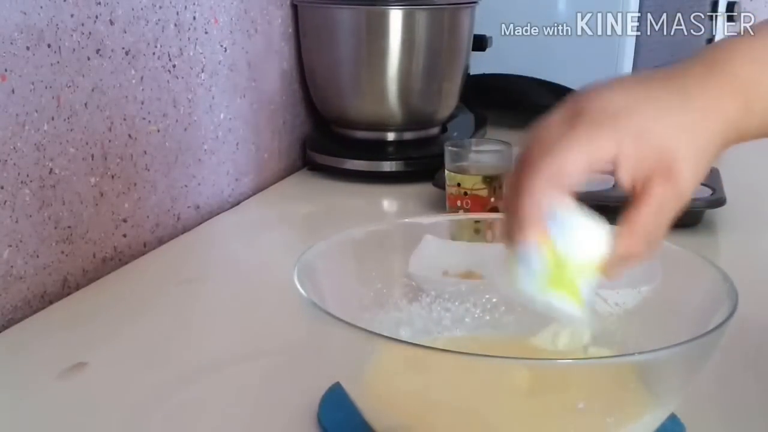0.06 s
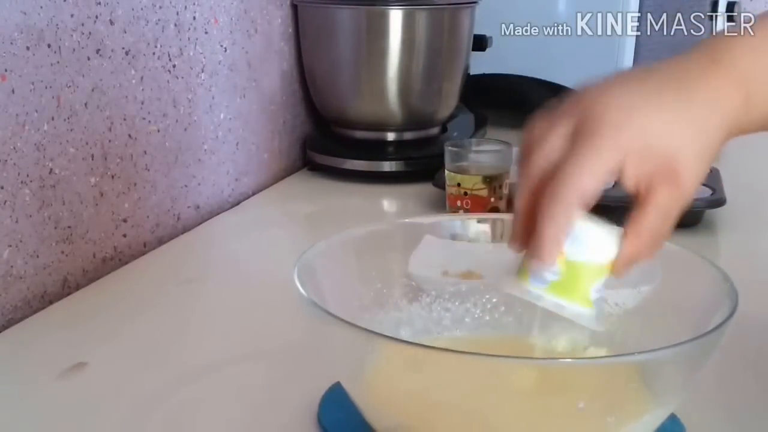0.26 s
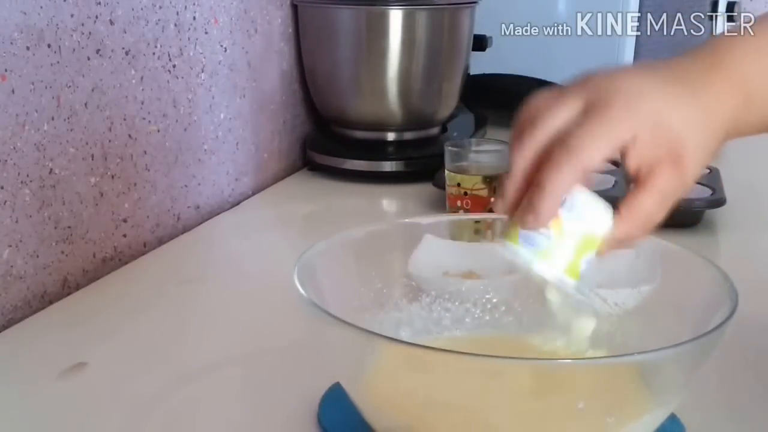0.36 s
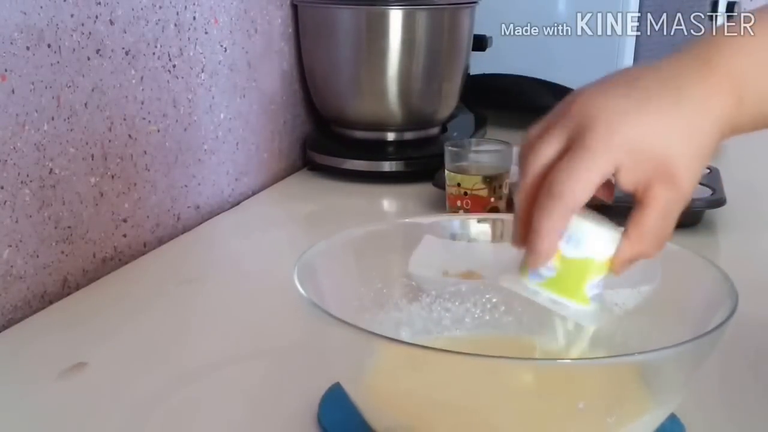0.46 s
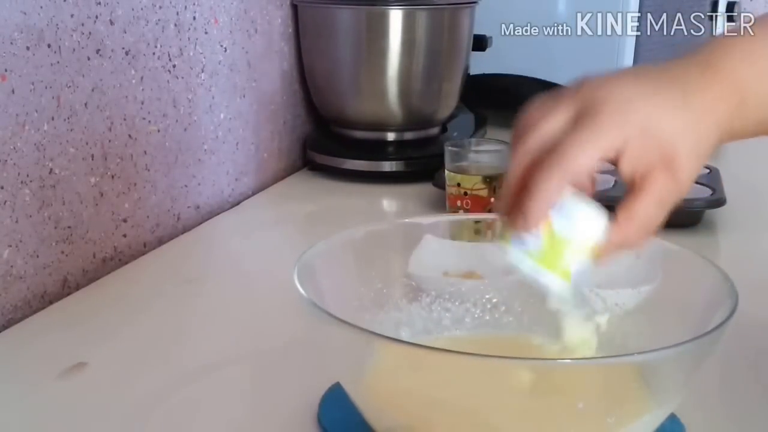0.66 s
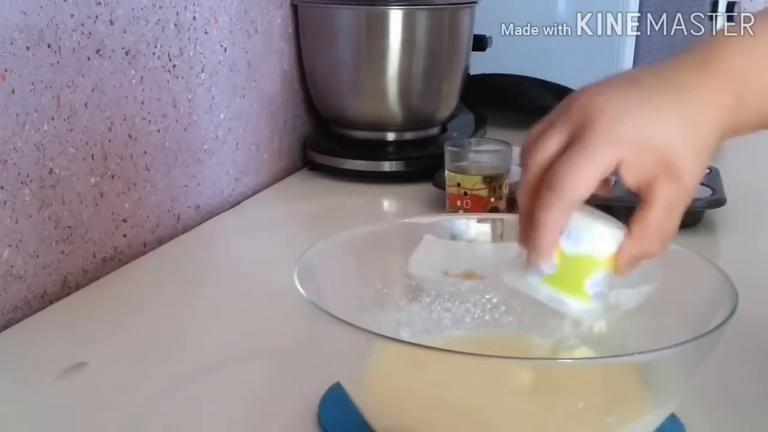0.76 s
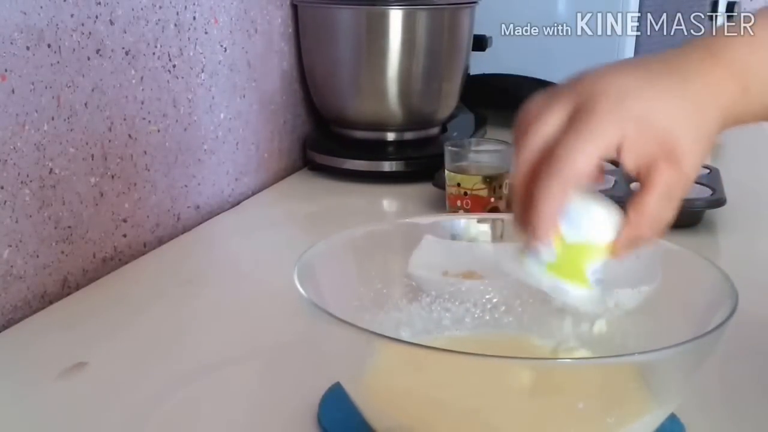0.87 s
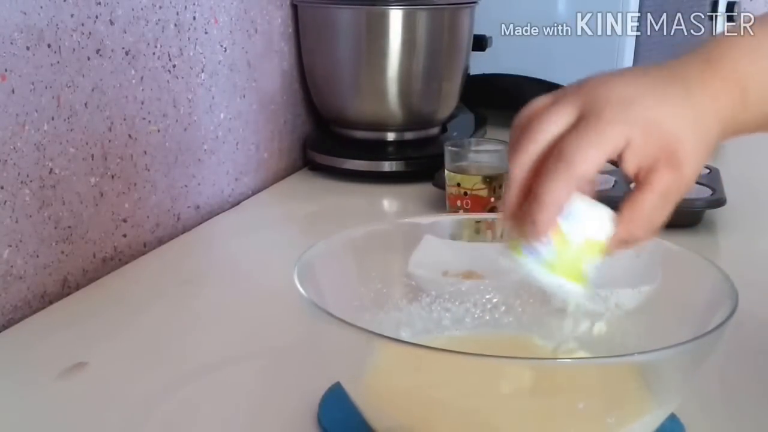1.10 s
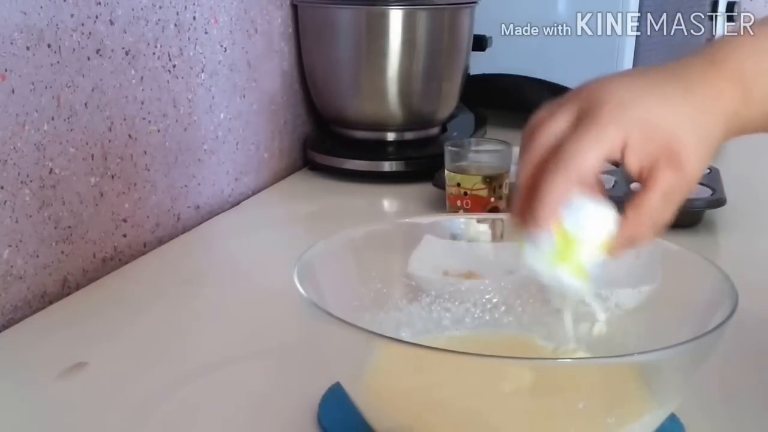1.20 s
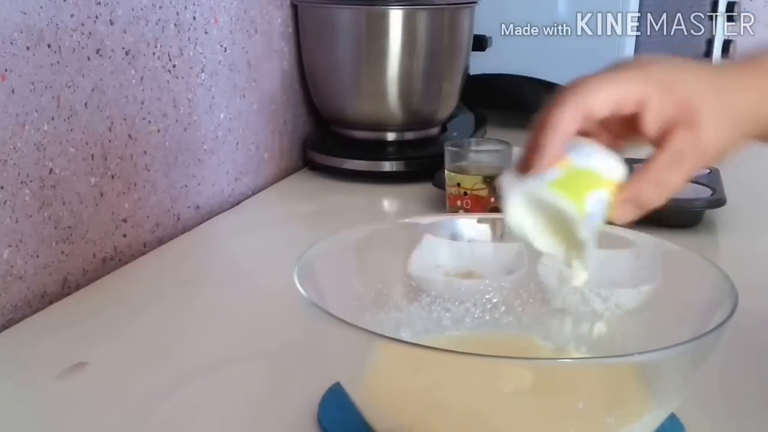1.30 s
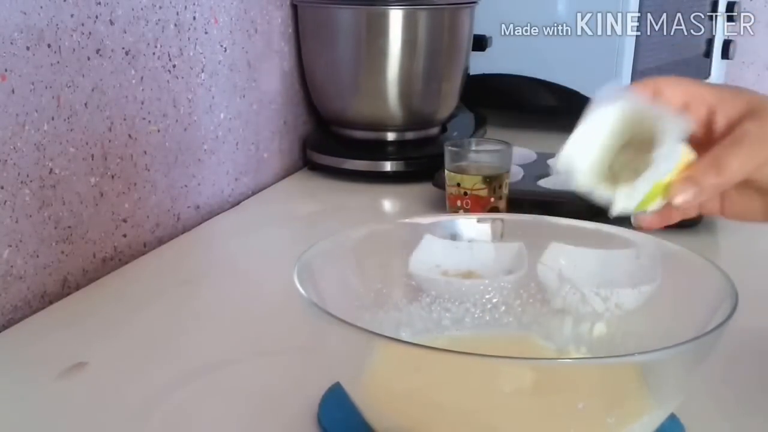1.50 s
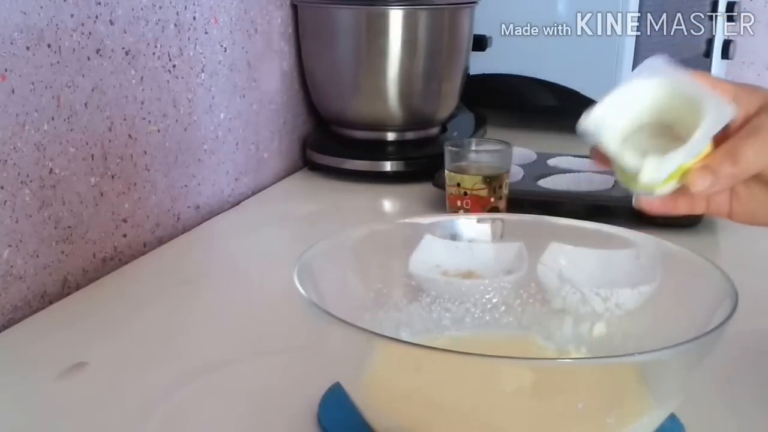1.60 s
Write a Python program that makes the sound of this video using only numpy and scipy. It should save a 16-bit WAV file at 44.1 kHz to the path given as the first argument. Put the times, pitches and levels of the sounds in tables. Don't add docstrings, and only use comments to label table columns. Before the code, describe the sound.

A plastic yogurt pot raps a glass mixing bowl eight times, at about 0.23, 0.41, 0.57, 0.73, 0.88, 1.02, 1.15 and 1.27 seconds, slightly quickening. Faint finger ticks come first. Each rap is a sharp crack with a short hollow pock, base knock and low counter thud; the fifth and sixth are loudest. Glass ringing and hard kitchen reflections fade over soft hum after the last.

```python
import sys
import numpy as np
from scipy import signal
from scipy.fft import rfft, irfft, next_fast_len
from scipy.io import wavfile

SR = 44100
rng = np.random.default_rng(int(sys.argv[2]) if len(sys.argv) > 2 else 0)


def decibels_to_gain(level_db):
    exponent = np.asarray(level_db, float) / 20
    return 10 ** exponent


def generate_wav(sig):
    pcm = np.round(np.clip(np.atleast_2d(sig).T, -1, 1) * 32767).astype(np.int16)
    wavfile.write(sys.argv[1], SR, pcm)


N = 72765
T = np.arange(SR * 3 // 4) / SR
SIDE = np.array([[.5], [-.5]])


def along(points, hz):
    f, value = np.transpose(points)
    return np.interp(np.log(hz + 1), np.log(f + 1), value)


def filtered(x, response):
    m = next_fast_len(x.shape[-1] + 8192)
    spectrum = rfft(x, m) * response(np.fft.rfftfreq(m, 1 / SR))
    return irfft(spectrum, m)[..., :x.shape[-1]]


def pair(noise, alike):
    angle = np.arccos(np.clip(alike, -1, 1)) / 2
    mid, side = np.cos(angle) * noise[0], np.sin(angle) * noise[1]
    return np.array([mid + side, mid - side])


def add(mix, s, sound):
    part = mix[:, round(s * SR):][:, :sound.shape[-1]]
    part += sound[..., :part.shape[1]]


# (frequency [Hz], density [dB per Hz])
HUM_COLOUR = [(25, -12), (60, -17), (110, -13.5), (300, -7), (600, -13.5), (1000, -15.5), (4300, -22.5),
              (14500, -29.5)]
# (frequency [Hz], left-right likeness [-1 to 1])
HUM_ALIKE = [(60, 0.28), (300, 0.31), (1500, 0.13), (8000, 0.11)]
# (time [s], level [dB])
HUM_FADE = [(0, 0.5), (.12, 2.5), (.2, -1), (1.65, -2.5)]
HUM_DB = -52


def hum():
    noise = rng.standard_normal((2, N))

    def mid_and_side(hz):
        angle = np.arccos(np.clip(along(HUM_ALIKE, hz), -1, 1)) / 2
        return decibels_to_gain(along(HUM_COLOUR, hz)) * [np.cos(angle), np.sin(angle)]

    mid, side = filtered(noise, mid_and_side)
    fade_db = np.interp(np.arange(N) / SR, *np.transpose(HUM_FADE))
    return decibels_to_gain(HUM_DB + fade_db) * np.array([mid + side, mid - side]) / np.sqrt(np.mean(mid ** 2))


# (frequency [Hz], width [Hz], level [dB])
WALL = [(1940, 540, -3.5), (2505, 410, 1), (3090, 270, 0), (3603, 170, 2), (4000, 130, -1), (4414, 690, -2),
        (5180, 130, -16.5), (6283, 1000, -11), (7100, 1700, -28.5), (7970, 2400, -13.5)]
WALL_SIGN = [1, -1, 1, 1, 1, -1, 1, 1, -1, 1]
WALL_SCATTER = .012


def crack(t60, grit):
    burst = grit * decibels_to_gain(-60 * T / t60) * rng.standard_normal(len(T)) + (T == 0)
    shifts = 1 + WALL_SCATTER * rng.standard_normal(len(WALL))

    def wall(f):
        total = 0
        for (hz, width, db), shift, sign in zip(WALL, shifts, WALL_SIGN):
            damping = 1j * f * width
            total = total + sign * decibels_to_gain(db) * damping / ((hz * shift) ** 2 - f * f + damping)
        return total

    x = filtered(burst, wall)
    return x / np.abs(x).max()


# (frequency [Hz], T60 [s])
KITCHEN = [(200, 0.19), (600, 0.52), (1500, 0.53), (3000, 0.52), (7000, 0.47), (14000, 0.29)]
# (frequency [Hz], level [dB])
WET = [(200, -2.5), (600, 9), (1400, -2.5), (3000, -3), (6000, -6.5), (14000, 1.5)]
# (frequency [Hz], left-right likeness [-1 to 1])
WET_ALIKE = [(250, 0.9), (600, 0.42), (1500, 0.1), (5000, 0.05), (12000, 0.17)]
WET_DB, WET_GAP_S = -0.5, .003
SAME_PATH = .6


def kitchen(x, paths):
    noise = np.sqrt(SAME_PATH) * paths + np.sqrt(1 - SAME_PATH) * rng.standard_normal(paths.shape)
    hz, t, z = signal.stft(noise, SR, nperseg=128)
    z = pair(z, along(WET_ALIKE, hz)[:, None])
    z = z * decibels_to_gain(-60 * t / along(KITCHEN, hz)[:, None])
    tail = signal.istft(z, SR, nperseg=128)[1][:, :len(T)]
    tail = tail / np.linalg.norm(tail[0])
    tail = filtered(tail, lambda f: decibels_to_gain(WET_DB + along(WET, f)) * np.exp(-2j * np.pi * f * WET_GAP_S))
    return signal.fftconvolve(x[None], tail * (T > WET_GAP_S), axes=1)[:, :len(T)]


# (time [s], peak level [dB])
TICKS = [
    (.0885, -28.5),
    (0.28, -27),
    (0.01, -37),
]


def ticks(paths):
    near = np.zeros((2, N))
    for s, db in TICKS:
        tick = decibels_to_gain(db) * crack(0.029, 0.13)
        add(near, s, tick + kitchen(tick, paths))
    return near


def click():
    return decibels_to_gain(-60 * T / .004) * np.sin(2 * np.pi * 2700 * T)


def bright(x):
    corner_hz = 4630
    return filtered(x, lambda f: (1j * f / (corner_hz + 1j * f)) ** 2)


def snap():
    x = bright(decibels_to_gain(-60 * T / .008) * pair(rng.standard_normal((2, len(T))), 0.45))
    return x / np.abs(x).max()


POCK_RISE_S, POCK_HOLD_S, POCK_FALL_S = 0.00067, 0.00384, 0.00033
POCK_SAG = 0.95


def pock(hz):
    rise = 1 - np.exp(-T / POCK_RISE_S)
    phase = 2 * np.pi * hz * (T + POCK_SAG * POCK_RISE_S * rise)
    hand = np.exp(-np.maximum(T - POCK_HOLD_S, 0) / POCK_FALL_S)
    return rise * hand * np.sin(phase)


def knock(hz):
    return decibels_to_gain(-60 * T / 0.053) * np.sin(2 * np.pi * hz * T)


# (frequency [Hz], level [dB], T60 [s])
COUNTER = [(251.3, -2.5, 0.15), (275.4, 5, 0.086), (304.8, -1.5, 0.16), (524, -25.5, .1)]


def thud():
    modes = 0
    for hz, db, t60 in COUNTER:
        level_db = db + 2 * rng.standard_normal()
        modes = modes + decibels_to_gain(level_db - 60 * T / t60) * np.sin(2 * np.pi * hz * T)
    return (1 - np.exp(-T / 0.005)) * modes


BOWL_HZ = [875, 318, 752, 1352, 1539, 2099, 2972, 2515, 1250, 2975.6, 2690, 3985, 4110, 5100]
BOWL_DB = [-17, -21, -21, -13, -18, -18, -11, -20, -15, 0, -21, -18, -21, -25]
# (T60 [s], left-right difference [dB], left lead [rad])
BOWL = [(0.33, 8.5, 0.78), (0.45, 2, .1), (.45, -8, 0.34), (0.7, -17, 0.69), (0.68, -19, 0.79),
        (1, -1, 0.98), (0.51, 15, 0.44), (0.48, -10, 1.1), (0.11, 55.5, 0.16), (0.48, -19.5, 1.87),
        (0.6, 7, 2.2), (0.98, -4, 1.3), (0.36, 20, 1.8), (.4, -32, 3.2)]
STEADY = [6, 9]
RING_RISE_S, RING_DRIFT, RING_SCATTER_DB = .008, .002, 2


def bowl():
    luck = rng.standard_normal((len(BOWL), 2))
    luck[STEADY] = 0
    modes = 0
    for hz, db, (t60, pan_db, lead), (louder, sharper) in zip(BOWL_HZ, BOWL_DB, BOWL, luck):
        level_db = db + RING_SCATTER_DB * louder + SIDE * pan_db
        phase = 2 * np.pi * hz * (1 + RING_DRIFT * sharper) * T + SIDE * lead
        modes = modes + decibels_to_gain(level_db - 60 * T / t60) * np.sin(phase)
    return (1 - np.exp(-T / RING_RISE_S)) * modes


# (time [s], peak level [dB], pot pitch [Hz], bowl ring [dB], counter thud [dB])
RAPS = [
    (0.234, -5, 1333, -31.5, -34),
    (0.412, -3.5, 1463, -26, -32),
    (0.57, -1.5, 1340, -28, -35.5),
    (0.728, -2.5, 1343, -31, -33),
    (0.879, 0.5, 1237, -29.5, -32.5),
    (1.019, 0, 1250, -28, -31.5),
    (1.149, -4.5, 1390, -30.5, -36),
    (1.269, -3, 1483, -25.5, -35),
]
# (time [s], peak above 5 kHz [dB], base knock [Hz], knock level [dB], walls' answer [dB])
LANDING = [
    (0.2339, -32, 715, -34.5, -0.44),
    (0.4115, -11, 742, -24.5, 1.8),
    (0.5696, -10.5, 513, -30.5, -1.24),
    (0.7272, -9.5, 828, -28.5, 0),
    (0.8784, -31, 642, -49, -2.9),
    (1.0176, -16, 836, -27, -0.9),
    (1.1488, -12.5, 834, -27.5, 1.2),
    (1.268, -10.5, 825, -22, 0.75),
]
POCK_GRIP_DB = [3.05, -0.6, -3, -2.5, -4.5, -2.5, 2.7, 0.2]
START_LAG_S = .0003


def raps(paths):
    near, glass = np.zeros((2, 2, N))
    for rap, landing, grip_db in zip(RAPS, LANDING, POCK_GRIP_DB):
        s, db, pot_hz, ring_db, thud_db = rap
        _, edge_db, knock_hz, knock_db, wet_db = landing
        body = decibels_to_gain(db - 6 + grip_db) * pock(pot_hz)
        body = body + decibels_to_gain(thud_db + 7.5) * thud()
        body = body + decibels_to_gain(knock_db + 0.5) * knock(knock_hz)
        blow = decibels_to_gain(db) * (click() + decibels_to_gain(-1.5) * crack(0.021, 0.6))
        blow = blow + decibels_to_gain(edge_db + 11) * snap()
        spread = decibels_to_gain(db + 2.5) * crack(0.021, 0)
        spread = spread + decibels_to_gain(edge_db + 18) * bright(1. * (T == 0))
        add(near, s + START_LAG_S, body + blow + decibels_to_gain(wet_db) * kitchen(body + spread, paths))
        add(glass, s, decibels_to_gain(ring_db + 5) * bowl())
    return near, glass


# (frequency [Hz], left-right difference [dB])
PORTS = [(200, -0.5), (1200, -2), (3000, 3), (5000, -4.5), (9000, -7), (14000, -3)]
# (frequency [Hz], left lead [rad])
LEFT_LEAD = [(300, 0), (1500, .4), (4000, 1.1), (8000, 2), (11000, 1.6), (14000, 1.2)]


def ports(x):
    return filtered(x, lambda f: decibels_to_gain(SIDE * along(PORTS, f)) * np.exp(1j * SIDE * along(LEFT_LEAD, f)))


# (frequency [Hz], level [dB])
DIRECT_TOP = [(8000, -2), (12300, -8), (13100, -17), (14300, -16)]
LOW_CUT_HZ = 199


def band_limited(x):
    return filtered(x, lambda f: (1j * f / (LOW_CUT_HZ + 1j * f)) ** 2 * decibels_to_gain(along(DIRECT_TOP, f)))


def scene():
    paths = rng.standard_normal((2, len(T)))
    near, glass = raps(paths)
    return hum() + band_limited(ports(ticks(paths) + near) + glass)


def top_cut(x):
    return signal.sosfilt(signal.butter(12, 16630, fs=SR, output="sos"), x)


SHELF_HZ, SHELF_DB, SHELF_DB_PER_KHZ, TOP_HZ = 14750, -17, -7, 16600
TOP, KNEE = .93, 6


def record(dry):
    x = dry / (1 + np.abs(dry / TOP) ** KNEE) ** (1 / KNEE)

    def colour(f):
        shelf_db = SHELF_DB + SHELF_DB_PER_KHZ * (f - SHELF_HZ) / 1000
        return decibels_to_gain(np.where(f < SHELF_HZ, 0, shelf_db)) * (f < TOP_HZ)

    mix = filtered(x, colour)
    return top_cut(mix)


dry = scene()
out = record(dry)
generate_wav(out)
```